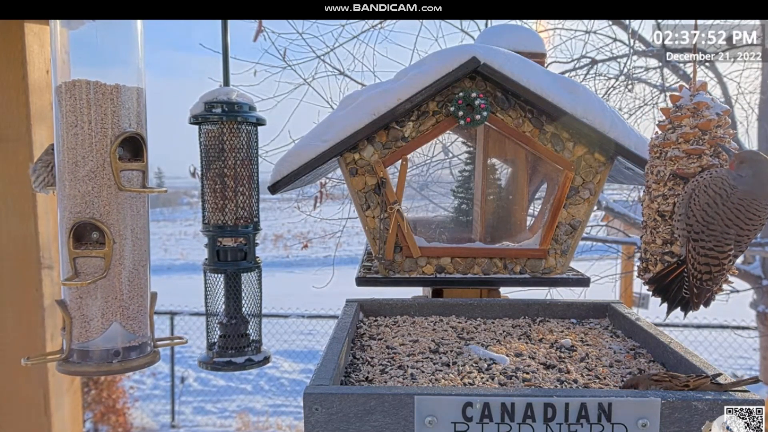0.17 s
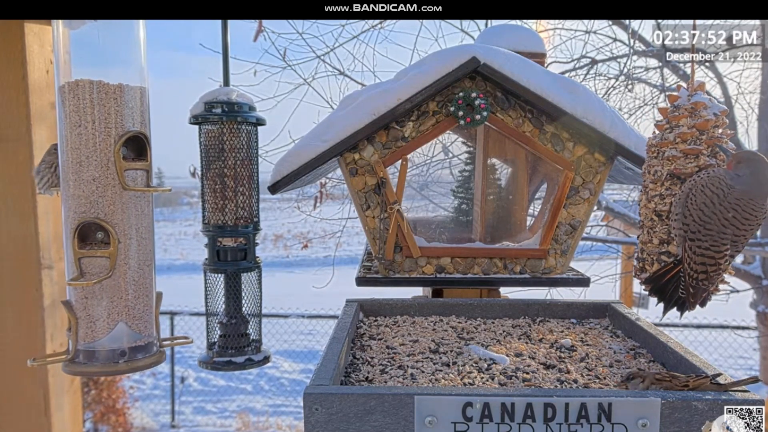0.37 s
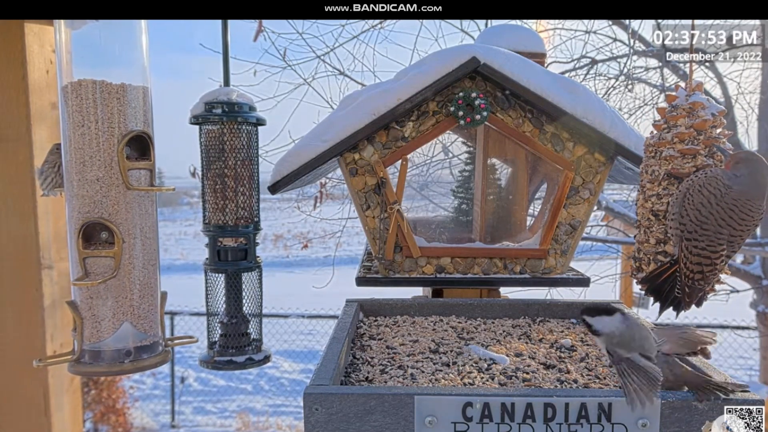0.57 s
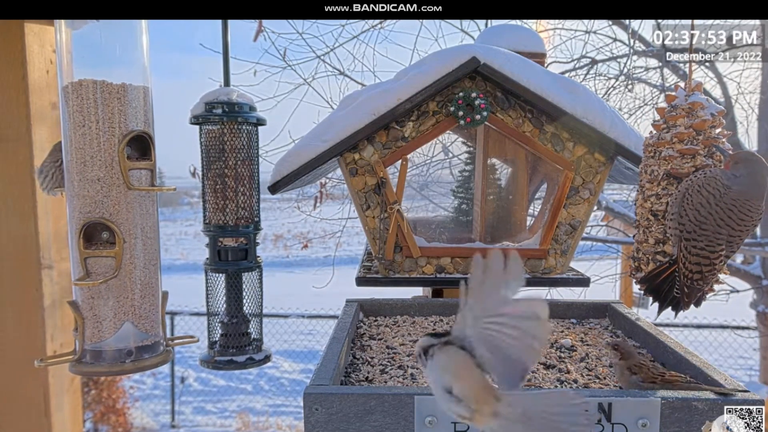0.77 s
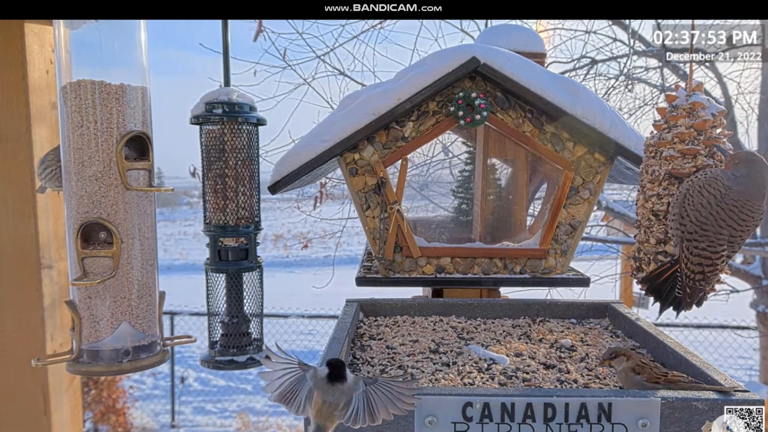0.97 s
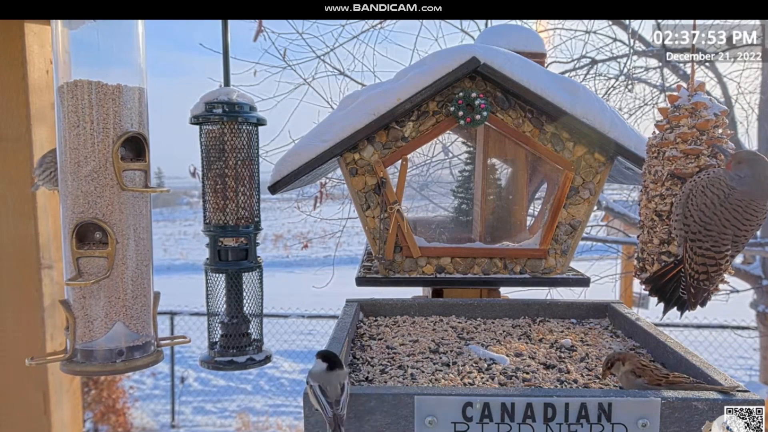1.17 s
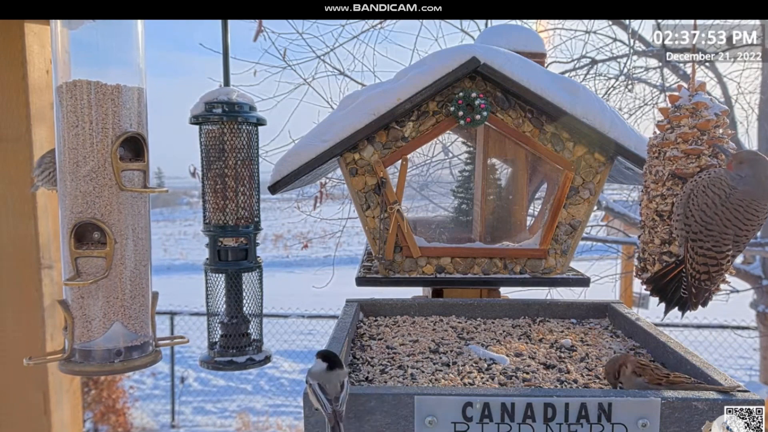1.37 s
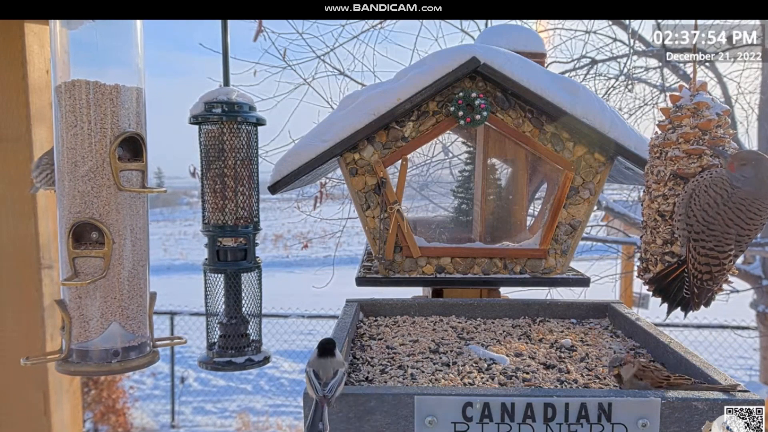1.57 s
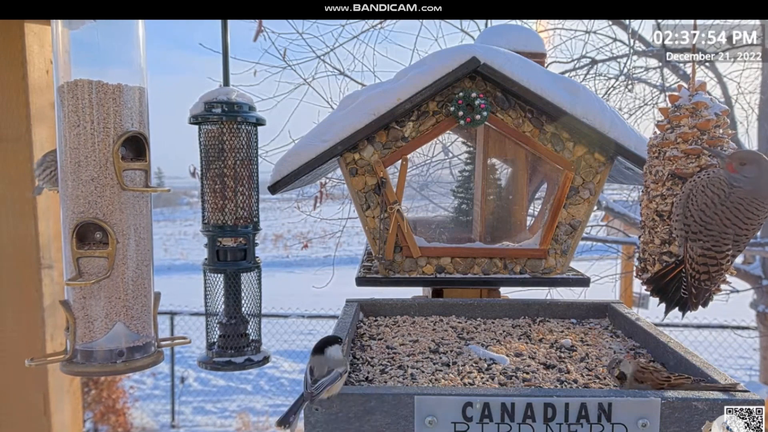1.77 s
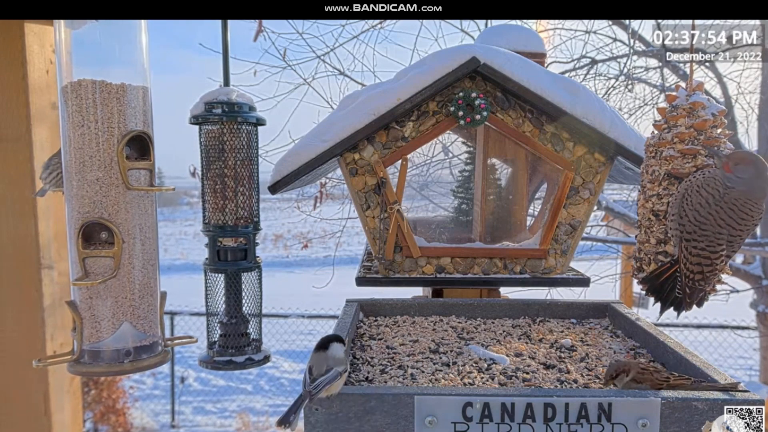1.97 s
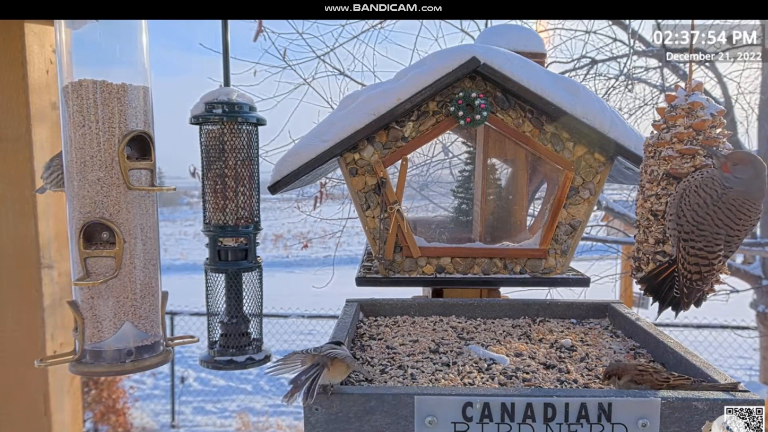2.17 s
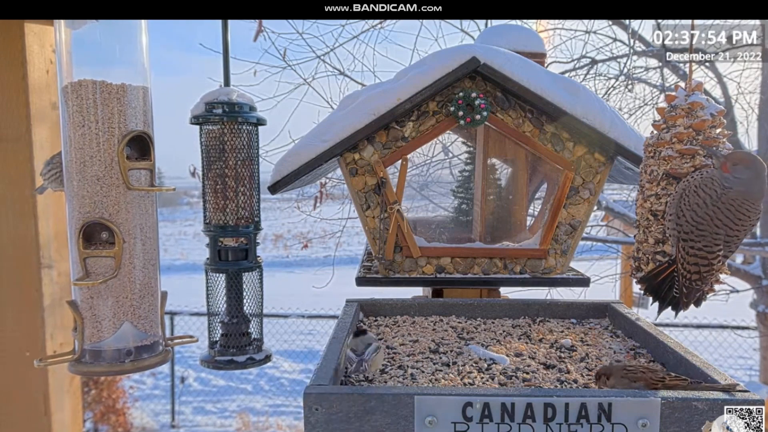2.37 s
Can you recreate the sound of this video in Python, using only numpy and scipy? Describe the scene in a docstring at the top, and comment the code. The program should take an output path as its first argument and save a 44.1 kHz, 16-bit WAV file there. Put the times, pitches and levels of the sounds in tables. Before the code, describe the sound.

One brief, high chip from a small bird sounds right by the microphone at an outdoor feeder. Then beaks and claws click lightly on seed and wood, with a tiny shell crack and soft rustles over a faint hum.

```python
"""A small bird gives one sharp, high chip close to the microphone, broken by a brief dropout.
It is a still winter day at a feeding tray: beaks and claws tick and scratch on seed and wood, a shell
cracks and the feeder pings, each blow ringing what it strikes. Seed and feathers rustle, wings puff air,
and thin calls come from farther off. Under it lie a faint hum, a distant wash and a little wind rumble."""
import sys
import numpy as np
from scipy import signal
from scipy.fft import rfft, irfft
from scipy.io import wavfile

SR = 44100
rng = np.random.default_rng(int(sys.argv[2]) if len(sys.argv) > 2 else 0)


def dump(signal):
    """Clip the signal to [-1, 1] and save it as 16-bit WAV at the path in sys.argv[1]."""
    limited = np.clip(np.atleast_2d(signal).T, -1, 1)
    pcm = np.round(limited * 32767).astype(np.int16)
    wavfile.write(sys.argv[1], SR, pcm)


N = 110250
T = np.arange(N) / SR


def amp(db):
    """Decibels to gain."""
    return 10 ** (np.asarray(db) / 20)

def unit(x):
    """Scales to rms 1."""
    return x / np.sqrt(np.mean(x ** 2) + 1e-30)

def add(mix, start, sound):
    """Mixes a sound in at a time in seconds."""
    part = mix[max(round(start * SR), 0):][:len(sound)]
    part += sound[:len(part)]

def envelope(points):
    """A gain curve through (seconds, dB) points."""
    return amp(np.interp(T, *np.transpose(points)))

def colour(x, points):
    """Gives a signal a spectrum, at rms 1."""
    hz, db = np.transpose(points)
    f = np.fft.rfftfreq(len(x), 1 / SR)
    gain = amp(np.interp(np.log(f + 1), np.log(hz), db))
    return unit(irfft(rfft(x) * gain, len(x)))

def drift(rate_hz):
    """Smooth random motion, at rms 1."""
    f = np.fft.rfftfreq(N, 1 / SR)
    return unit(irfft(rfft(rng.standard_normal(N)) * np.exp(-(f / rate_hz) ** 2), N))

def tail(db, t60, size=30000):
    """A diffuse echo that dies away."""
    decay = rng.standard_normal(size) * amp(-60 * np.arange(size) / SR / t60)
    return amp(db) * decay / np.linalg.norm(decay)


# Spectra of the distant wash and the wind. Each row: frequency in Hz, relative level in dB.
WASH_COLOUR = [(100, -10), (150, -8.5), (240, -15.5), (420, -12.5), (560, -15), (740, -12), (870, -14.5),
               (1100, -15.5), (1400, -20), (2100, -31), (3200, -34.5), (4600, -39), (7000, -34.5),
               (10000, -39.5), (15100, -46.5), (16000, -46.5)]
WIND_COLOUR = [(10, -10), (24, -1), (37, 4), (48, -11), (65, -13), (82, -18), (130, -24), (200, -36),
               (500, -66)]
# Wind at the microphone. Each row: time in seconds, level in dB.
WIND_LEVEL = [(0, -54), (.15, -65), (.28, -53), (.4, -59), (.7, -61), (1.03, -57), (1.25, -59.5),
              (1.6, -55), (1.72, -60), (2.07, -58), (2.135, -52), (2.21, -51.5), (2.28, -56.5), (2.5, -60)]
# A faint hum in the yard. Each row: frequency in Hz, level in dB.
HUM_TONES = [(99.2, -65.5), (776, -88), (1112.5, -83), (1236, -84)]

def background(wash_db=-68.5, waver_hz=1.5, flutter=.12):
    """The yard itself: a nearly steady distant wash, wind rumble and a wavering hum."""
    wash = amp(wash_db + .5 * drift(11)) * colour(rng.standard_normal(N), WASH_COLOUR)
    wind = envelope(WIND_LEVEL) * colour(rng.standard_normal(N), WIND_COLOUR)
    hum = np.zeros(N)
    for hz, db in HUM_TONES:
        level = amp(db) * (1 + flutter * drift(6))
        phase = 2 * np.pi * np.cumsum(hz + waver_hz * drift(4.5)) / SR
        hum += level * np.sqrt(2) * np.sin(phase)
    return wash + wind + hum


# The octave above the close bird's chip. Each row: time in seconds, level in dB.
OCTAVE_LEVEL = [(.196, -66), (.198, -52.5), (.209, -54.5), (.214, -73.5), (.256, -72.5), (.2605, -58.5),
                (.265, -66.5), (.274, -87)]

def whistle(contour):
    """One stretch of the chip: a near-pure tone with a weak octave."""
    times, hz, db = np.transpose(contour)
    sounding = (T >= times[0]) & (T < times[-1])
    phase = 2 * np.pi * np.cumsum(np.interp(T, times, hz) * sounding) / SR
    fundamental = amp(np.interp(T, times, db)) * np.sin(phase)
    return sounding * (fundamental + envelope(OCTAVE_LEVEL) * np.sin(2 * phase))


# One chip close to the microphone, before and after the dropout.
# Each row: time in seconds, pitch in Hz, level in dB.
CHIP_RISE = [(.196, 7350, -43), (.2, 7470, -35), (.2025, 7520, -25), (.206, 7630, -19.5),
             (.21, 7840, -20.8), (.216, 7970, -18.3), (.221, 8060, -20.3), (.2266, 8150, -25.3)]
CHIP_FALL = [(.2524, 8150, -24.5), (.2575, 8180, -25.5), (.2597, 7750, -27), (.2615, 6100, -29),
             (.2635, 4850, -37), (.266, 4650, -47), (.2695, 4450, -44), (.273, 4000, -68)]
# The rasp in the voice. Each row: time in seconds, level in dB.
RASP_LEVEL = [(.197, -82), (.204, -73), (.226, -62), (0.24, -49), (.248, -46), (.254, -56), (.264, -49),
              (0.271, -54), (.278, -73), (.30, -70), (.34, -90)]
# Its spectrum. Each row: frequency in Hz, relative level in dB.
RASP_SPECTRUM = [(2000, -41.5), (3600, -35.5), (4400, -9), (5600, -4), (7000, -8), (8000, -3.5),
                 (8900, -13), (12000, -27), (15500, -28)]

def chip(onset_s=.0015):
    """One chip swells and rises, drops out briefly, then returns abruptly and plunges into a rasp."""
    onset = np.sin(np.pi / 2 * np.clip((T - CHIP_RISE[0][0]) / onset_s, 0, 1)) ** 2
    rasping = (T > RASP_LEVEL[0][0]) & (T < RASP_LEVEL[-1][0])
    rasp = rasping * envelope(RASP_LEVEL) * colour(rng.standard_normal(N), RASP_SPECTRUM)
    return onset * whistle(CHIP_RISE) + whistle(CHIP_FALL) + rasp


def swells(rows):
    """One smooth arch of level for each row."""
    return sum(amp(db) * np.sin(np.pi * np.clip((T - start) / length, 0, 1))
               for start, length, db in rows)


# Seed and feathers at the tray. Each row: start in seconds, length in seconds, level in dB.
RUSTLE_SWELLS = [(0.41, 0.086, -80), (0.999, 0.079, -69.5), (1.163, 0.053, -73), (1.383, 0.017, -70),
                 (1.405, 0.016, -67), (1.49, 0.051, -74.5), (1.655, 0.023, -75), (1.783, 0.076, -80.5),
                 (1.994, 0.011, -74), (2.33, 0.028, -67), (2.346, 0.06, -78)]
# Their spectrum. Each row: frequency in Hz, relative level in dB.
RUSTLE_SPECTRUM = [(500, -18), (2000, -2.5), (4000, -7.5), (5500, 1), (7500, 1.5), (10500, -3.5),
                   (13000, -10), (16000, -23)]

def rustles(grains_per_s=7000, spread_db=3):
    """Dense tiny grains swell and fade as a bird shifts."""
    grains = rng.standard_normal(N) * (rng.random(N) < grains_per_s / SR)
    grains *= amp(spread_db * np.minimum(rng.exponential(1, N), 3))
    return colour(grains, RUSTLE_SPECTRUM) * swells(RUSTLE_SWELLS)


# Birds farther off. Each row: start and length in seconds, first and last pitch in Hz, level in dB.
DISTANT_CALLS = [(.49, .02, 7000, 7400, -79), (2.193, .02, 7050, 7550, -76), (2.406, .038, 6650, 8050, -69)]

def far_calls(scatter_depth=.45, blur_hz=330):
    """Short upward whistles, scattered and blurred by distance."""
    calls = np.zeros(N)
    scatter = 1 + scatter_depth * (drift(blur_hz) + 1j * drift(blur_hz))
    for start, length, low, high, db in DISTANT_CALLS:
        progress = np.clip((T - start) / length, 0, 1)
        arch = np.sqrt(4 * progress * (1 - progress))
        phase = 2 * np.pi * np.cumsum(low + (high - low) * progress) / SR
        calls += amp(db) * arch * (scatter * np.exp(1j * phase)).real
    return calls + signal.fftconvolve(calls, tail(db=-6.5, t60=.17))[:N]


def ring(blows, modes, size=6000):
    """Each blow rings an object's modes, tilted brighter or duller about the strongest one."""
    out, t = np.zeros(N), np.arange(size) / SR
    main_hz = max(modes, key=lambda mode: mode[1])[0]
    for start, db, tilt in blows:
        for hz, mode_db, t60 in modes:
            struck_db = db + mode_db + tilt * np.log2(hz / main_hz)
            add(out, start, amp(struck_db - 60 * t / t60) * np.sin(2 * np.pi * hz * t))
    return out


# Claws on a perch. Each row: start in seconds, level in dB, tilt in dB per octave.
PERCH_BLOWS = [(.548, -72, -2), (2.0402, -71, 7.5), (2.0856, -67.5, -5)]
# The perch's modes. Each row: frequency in Hz, gain in dB, t60 in seconds.
PERCH_MODES = [(1830, -3, .025), (2700, -7, .02), (3990, 0, .038), (5480, 0, .018), (5750, -5, .016),
               (7130, -1, .016), (8020, -3, .055), (11100, -21, .03), (14700, -21, .04)]

def perch_taps():
    """Claws tap lightly and the perch rings."""
    return ring(PERCH_BLOWS, PERCH_MODES)


# Beaks on wood. Each row: start in seconds, level in dB, tilt in dB per octave.
WOOD_BLOWS = [(.7450, -66, -4), (.8680, -60.5, -5)]
# The wood's modes. Each row: frequency in Hz, gain in dB, t60 in seconds.
WOOD_MODES = [(2030, -14, .045), (2600, -7, .025), (3050, -3, .011), (3420, 1, .014), (5750, -17, .025)]

def pecks():
    """A beak strikes wood, which rings briefly."""
    return ring(WOOD_BLOWS, WOOD_MODES)


# Wings at the tray. Each row: start in seconds, length in seconds, level in dB.
PUFF_SWELLS = [(.77, .13, -73.5), (.96, .1, -70.5)]
# Their spectrum. Each row: frequency in Hz, relative level in dB.
PUFF_SPECTRUM = [(60, -18), (150, 4), (210, 4), (350, -26), (800, -30), (3000, -59)]

def wing_puffs():
    """Wings push soft, low puffs of air."""
    return colour(rng.standard_normal(N), PUFF_SPECTRUM) * swells(PUFF_SWELLS)


# Beaks and claws ticking at the tray, and claws scratching softly in the seed.
# Each row: start in seconds, level in dB, centre in Hz, width in octaves, t60 in seconds.
BEAK_AND_CLAW_TICKS = [(0.7777, -62.5, 3450, 2.26, 0.044), (.8275, -79, 9000, 1, .008),
                       (.8835, -64.5, 5900, 1.6, 0.025), (.9487, -65.5, 7000, 1.4, 0.012),
                       (1.029, -62, 7500, 1.5, 0.014), (1.0472, -69, 11000, 1, 0.0056),
                       (1.1703, -65, 7040, 0.59, .01), (1.174, -65, 5470, 0.3, .01),
                       (1.1802, -60, 7100, 1.1, .015), (1.19, -47.5, 8640, 0.62, 0.018),
                       (1.3897, -71, 7000, 1.8, .02), (1.4267, -49.5, 7100, 0.69, 0.037),
                       (1.8528, -66.5, 6500, 0.48, .008), (1.9408, -71.5, 4400, 0.83, 0.0085),
                       (2.1474, -59, 6440, 1.13, 0.014), (2.1692, -66.5, 7030, 1.8, 0.017),
                       (2.2243, -73, 7500, 1.3, 0.0057), (2.3732, -65, 7000, 1.8, .008),
                       (2.384, -74, 9000, 1.4, .008), (2.3913, -67, 5000, 0.74, .01),
                       (2.4822, -59, 5960, 0.88, 0.0077)]
SEED_SCRATCHES = [(1.13, -74, 7800, 0.37, 0.093), (1.4965, -70, 7000, 1, 0.026),
                  (1.4985, -67.5, 10100, 0.29, .02), (1.5195, -67.5, 7100, 0.37, .016),
                  (1.6503, -63.5, 7200, 1.7, 0.018), (1.767, -75, 6500, 0.92, .02),
                  (1.7945, -65.5, 7000, 1.4, 0.042), (1.809, -76, 6500, 1.1, .02),
                  (2.004, -73.5, 6960, 0.62, 0.013)]

def crackles(rows, rise_s=None, snap_s=.0004, snap_db=8, skirt_db=-38, size=4096):
    """Noise dies quickly in one broad resonance: a tick snaps; a scratch swells over its rise time."""
    out, t = np.zeros(N), np.arange(size) / SR
    head = size // (32 if rise_s else 64)  # the opening samples set the level
    for start, db, hz, octaves, t60 in rows:
        fade = amp(-60 * t / t60)
        shape = fade * np.minimum(t / rise_s, 1) if rise_s else fade + amp(snap_db) * np.exp(-t / snap_s)
        burst = rng.standard_normal(size) * shape
        half_width = 2 ** (octaves / 2)
        edges_hz = np.clip([hz / half_width, hz * half_width], [100, 200], [18000, 20000])
        resonance = signal.lfilter(*signal.butter(2, edges_hz, "band", fs=SR), burst)
        crackle = resonance + amp(skirt_db) * burst
        add(out, start, amp(db) * crackle / np.std(crackle[:head]))
    return out


# Feet and beaks on the tray. Each row: start in seconds, level in dB, tilt in dB per octave.
TRAY_BLOWS = [(.7778, -59.5, -9), (.87, -75, -1), (1.4275, -73, 9), (2.1475, -74, 15), (2.4825, -76.5, 6)]
# The tray's modes. Each row: frequency in Hz, gain in dB, t60 in seconds.
TRAY_MODES = [(1000, -7, 0.053), (1400, 6.5, 0.019), (1780, 1.5, .025), (1930, 0, 0.028),
              (2230, 5.5, 0.012), (2700, -24, 0.022)]

def tray_knocks():
    """The struck tray answers with a dull knock."""
    return ring(TRAY_BLOWS, TRAY_MODES)


# A hard seed giving way. Each row: start in seconds, level in dB, tilt in dB per octave.
SHELL_BREAKS = [(1.1895, -47.5, 4), (1.1911, -57, -2)]
# The shell's modes. Each row: frequency in Hz, gain in dB, t60 in seconds.
SHELL_MODES = [(6130, -13, .018), (7400, -4, .024), (8100, -13, .02), (9240, -4.5, 0.022),
               (11070, -11.5, .016), (13200, -7, 0.015), (14900, -13, .013)]

def shell_crack():
    """Two breaks, almost at once, ring the seed's shell."""
    return ring(SHELL_BREAKS, SHELL_MODES)


# A beak on the feeder. Each row: start in seconds, level in dB, tilt in dB per octave.
FEEDER_BLOWS = [(1.4275, -56.5, 7)]
# The feeder's modes. Each row: frequency in Hz, gain in dB, t60 in seconds.
FEEDER_MODES = [(1440, -9.5, .023), (2530, -7, .02), (3900, -8, .028), (5030, -5, .017), (5500, 6, .021),
                (5900, -3, .02), (7150, 1, .013), (8020, 0, .048), (9750, -3, .017), (11100, -4, .018),
                (11500, -14, .026), (12900, -17, .03)]

def feeder_ping():
    """One sharp peck rings the feeder brightly."""
    return ring(FEEDER_BLOWS, FEEDER_MODES)


# Surfaces near the microphone. Each row: delay in seconds, gain in dB.
NEAR_ECHOES = [(.0017, -28.5), (.0046, -37), (.035, -42.5), (.081, -50.5)]

def yard(direct):
    """Adds single echoes from the feeders, a short scatter and a faint tail from the yard."""
    response = tail(db=-26.5, t60=.13) + tail(db=-41, t60=.53)
    for delay, db in NEAR_ECHOES:
        add(response, delay, amp([db]))
    return direct + signal.fftconvolve(direct, response)[:N]


def scene():
    """Birds and feeder over the quiet yard, from one microphone near the tray."""
    ambience = background()
    birds = chip() + rustles() + far_calls() + perch_taps() + pecks() + wing_puffs()
    birds += crackles(BEAK_AND_CLAW_TICKS) + tray_knocks()
    birds += crackles(SEED_SCRATCHES, rise_s=.0012) + shell_crack() + feeder_ping()
    return (ambience + yard(birds))[None]


# The dropout in mid-chip. Each row: time in seconds, gain in dB.
DROPOUT_GAIN = [(.22615, 0), (.2262, -28), (.23, -45), (.237, -45), (.242, -14), (.2523, -12), (.2524, 0)]

def record(dry):
    """The sound drops out for a moment, and the treble ends near 16 kHz."""
    lowpass = signal.firwin(255, 16100, window=("kaiser", 9), fs=SR)
    return signal.oaconvolve(dry * envelope(DROPOUT_GAIN), lowpass[None], "same")


dry = scene()
out = record(dry)
dump(out)
```